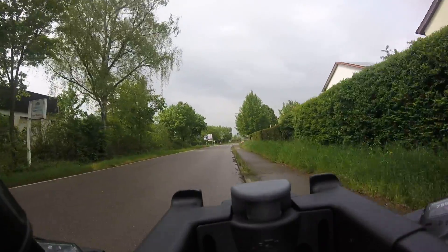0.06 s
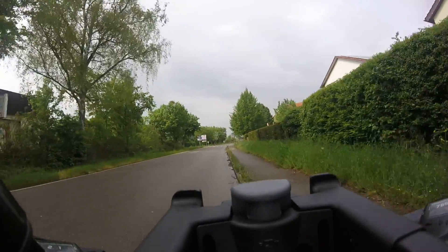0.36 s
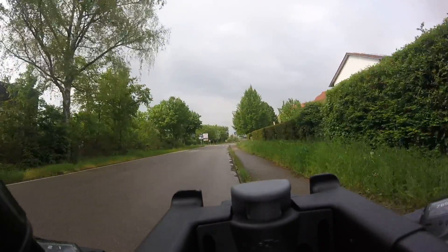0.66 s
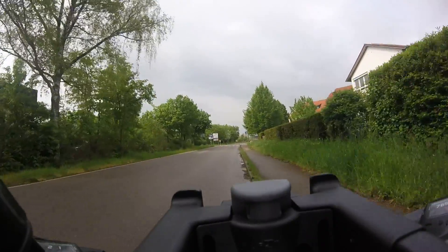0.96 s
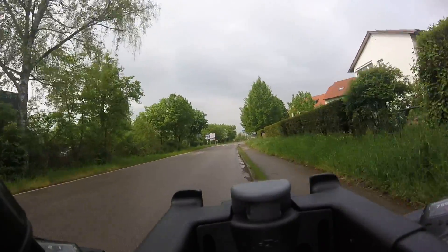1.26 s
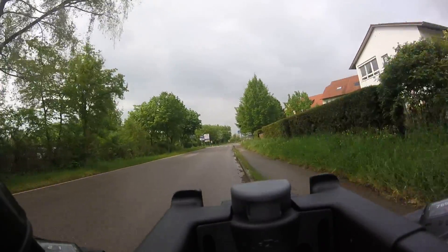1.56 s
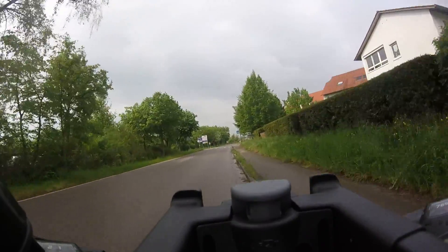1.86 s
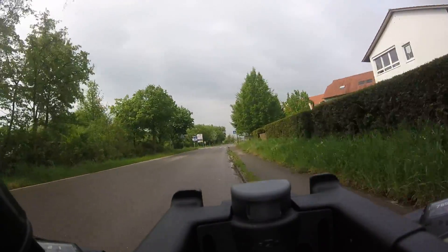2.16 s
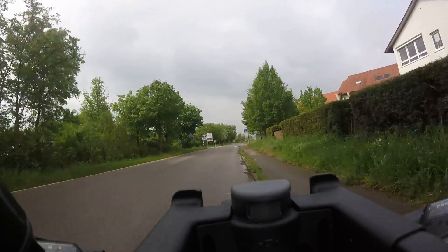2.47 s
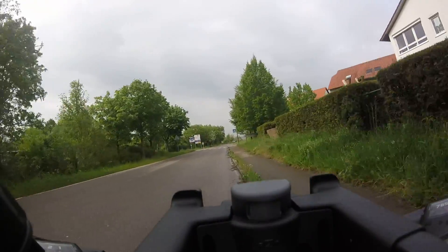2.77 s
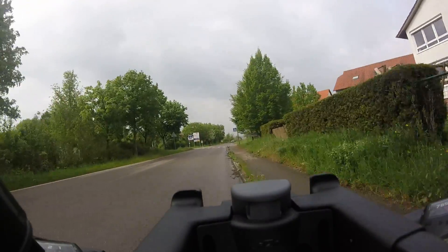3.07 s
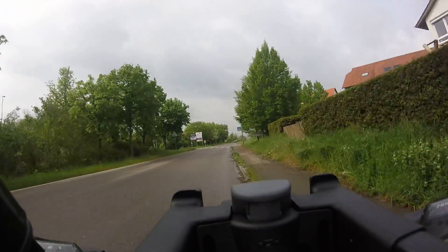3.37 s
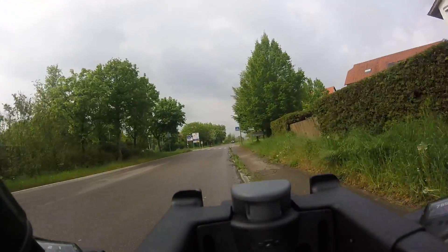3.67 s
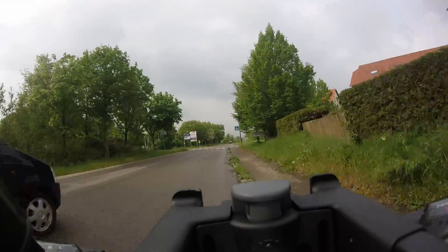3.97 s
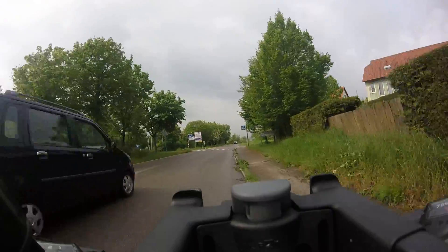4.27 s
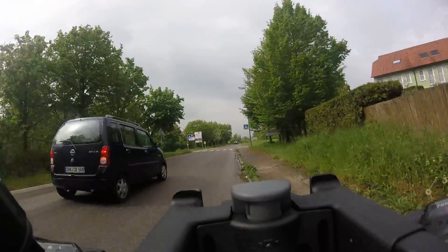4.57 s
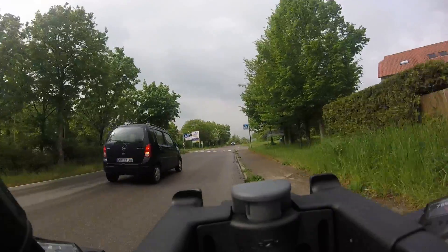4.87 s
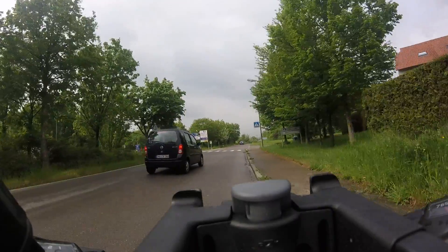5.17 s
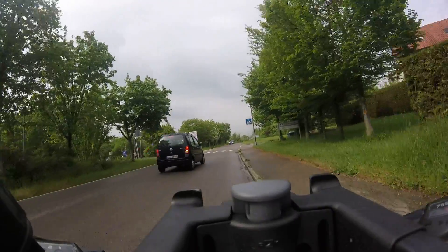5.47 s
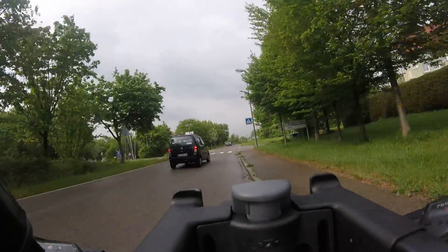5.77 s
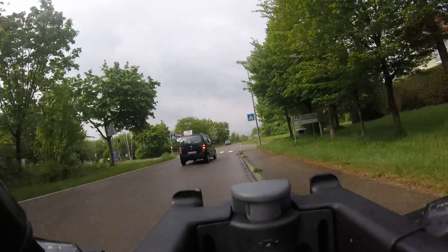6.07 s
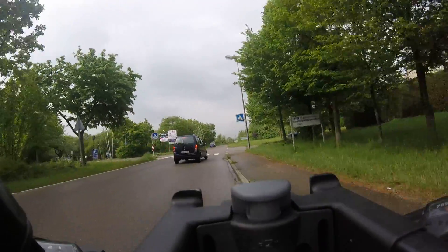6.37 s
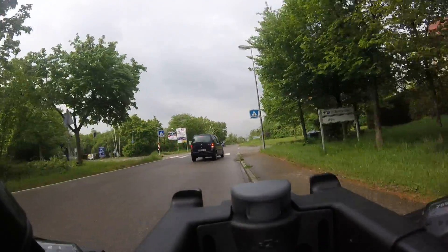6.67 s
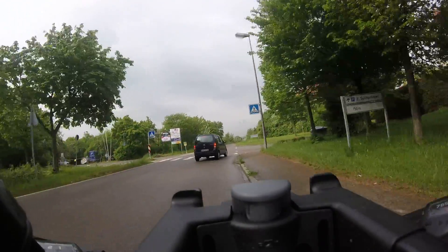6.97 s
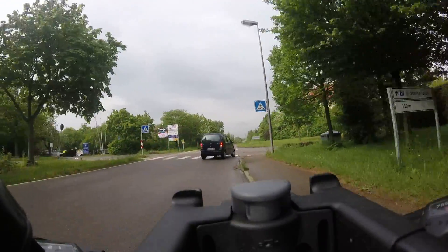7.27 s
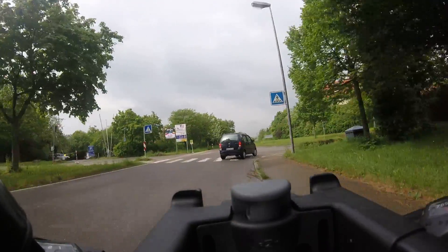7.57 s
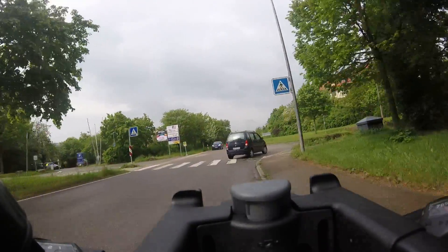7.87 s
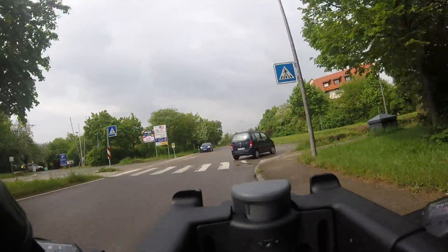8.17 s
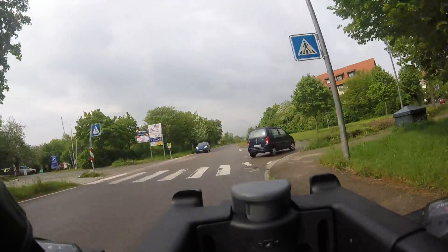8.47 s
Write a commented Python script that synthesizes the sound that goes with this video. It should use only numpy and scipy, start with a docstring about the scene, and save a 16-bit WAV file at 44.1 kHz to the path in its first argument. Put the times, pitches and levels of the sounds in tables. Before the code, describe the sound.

A bicycle rides on asphalt for about eight and a half seconds, heard from the handlebar with a close, boxy colour. Throughout, the tyres drone loudly in several wavering tones over road rumble, gritty noise and a deep throbbing dynamo hum. The chain patters with the pedal strokes, and fittings and cables tick and clack lightly. A hollow knock comes at 1.2 seconds and a softer one at 3.7. From about 3.5 to 5 seconds a car overtakes with faint tyre hiss and a low rumbling wake. The bicycle's hum drops between 4 and 5 seconds, with deep brief thumps at 4 and 4.8. The drone returns with another knock at 5.3 and more frequent clacks. The loudest, sharpest knock lands at 7 seconds, followed by a small rattling bump near 7.8. From 8 seconds the chain fades and the freewheel ticks softly under the continuing hum.

```python
"""Bicycle on asphalt, from the handlebar

One microphone inside a camera case clamped to the bar; the case colours every contact. Up close, road
shake rumbles in the frame, the tyres hum with the speed and the hub dynamo throbs with each wheel turn.
The chain patters under the pedal strokes, loose fittings rattle and a few bumps knock the mount.
Further off, a car overtakes near the middle. At the end the rider coasts and the freewheel ticks."""
import sys
import numpy as np
from scipy import signal
from scipy.fft import rfft, irfft
from scipy.io import wavfile
from scipy.ndimage import uniform_filter1d, minimum_filter1d, map_coordinates

SR = 44100
rng = np.random.default_rng(int(sys.argv[2]) if len(sys.argv) > 2 else 0)


def generate_wav(sig):
    """Save sig (samples, or channels by samples) to the path in sys.argv[1] as 16-bit PCM at SR."""
    pcm = np.round(np.clip(np.atleast_2d(sig).T, -1, 1) * 32767).astype(np.int16)
    wavfile.write(sys.argv[1], SR, pcm)


N = 380141

# riding speed: time_s, wheel_turns_per_s
WHEEL_SPEED = [(0, 2.688), (.7, 2.721), (1.4, 2.731), (2.2, 2.768), (3, 2.794), (3.8, 2.817), (4.6, 2.816),
               (5.4, 2.87), (6, 2.873), (6.6, 2.927), (7.4, 2.917), (8, 2.873), (8.62, 2.822)]
# base level of the gritty road noise: time_s, level_db
ROAD_NOISE = [(0, -39), (.9, -39.5), (2, -39), (3.7, -38.5), (4, -41), (4.3, -44), (4.8, -40), (5.3, -39.5),
              (6, -41), (6.9, -40), (7.75, -38.5), (8, -42), (8.62, -39.5)]
# base levels of the two lower tread tones: time_s, low_db, middle_db
TREAD_HUM = [(0, -29, -12.5), (.45, -22.5, -19.5), (.9, -25.5, -20), (1.2, -19.5, -17), (1.45, -28.5, -22),
             (1.7, -20.5, -18.5), (2.2, -25, -19.5), (2.5, -25.5, -22), (3, -18, -24.5), (3.6, -23, -22),
             (4.1, -26.5, -32.5), (4.55, -28, -31.5), (5, -24.5, -29), (5.4, -22, -28), (6, -22, -29.5),
             (6.7, -21, -31.5), (7.3, -20, -28), (7.8, -20.5, -32.5), (8.15, -23.5, -28),
             (8.62, -27, -17.5)]
# base level of the tread's singing tone: time_s, level_db
TREAD_SING = [(0, -26), (.45, -27), (.8, -30), (1.2, -32), (1.38, -26), (1.55, -36), (1.6, -20.5),
              (1.85, -25), (2.05, -21.5), (2.48, -30), (2.58, -22), (2.68, -33), (2.98, -21.5), (3.2, -27),
              (3.35, -24.5), (3.6, -31), (3.8, -28), (4.1, -36), (4.5, -40), (5, -35), (5.3, -24.5),
              (5.52, -33), (5.72, -26), (6.4, -30), (6.62, -25), (7, -25.5), (7.15, -30), (7.3, -24.5),
              (7.8, -29), (8.62, -23.5)]
# base level of the dynamo's hum: time_s, level_db
DYNAMO_HUM = [(0, -27), (.7, -25), (1.6, -25.5), (2.4, -26.5), (3, -25), (3.6, -26.5), (4.05, -24),
              (4.5, -23), (5.8, -25.5), (6.2, -28), (6.8, -23), (7.6, -25), (8.62, -25.5)]
# where the dynamo drags in each wheel turn: place_turns, width_turns, rise_db
DYNAMO_DRAG = [(0.273, 0.086, 11), (.48, 0.041, 6.5), (.82, 0.069, 11)]
# the two legs' pushes in each crank turn: place_turns, width_turns, effort_share
PEDAL_PUSHES = [(0.371, 0.15, .95), (.85, 0.16, 0.8)]
# rough patches that rattle the chain and fittings: centre_s, width_s, rise_db
ROUGH_PATCHES = [(0.333, 0.11, 5), (1.19, 0.08, 7), (2.036, 0.079, 7), (3.68, 0.11, 7), (6.164, 0.06, 5),
                 (6.98, .03, 6), (7.74, 0.08, 9)]
# two brief, deep thumps in the rumble: centre_s, peak_db
LOW_THUMPS = [(4.04, -6.5), (4.795, -11)]
# bumps that knock the mount: start_s, ring_peak_db, ring_pitch_hz, crack_peak_db
ROAD_BUMPS = [(1.1765, -16, 645, -26), (3.669, -27, 640, -32), (5.325, -19, 645, -33),
              (6.971, -7, 612, -19), (7.771, -26, 640, -36)]
# the mount's upper modes, relative to its hollow ring: pitch_hz, level_db, t60_s
MOUNT_MODES = [(1035, -20, .04), (1690, -3.5, .022), (1960, -11, .022), (2380, -11, .022)]
# resonances and notches of the case around the microphone: centre_hz, width_hz, gain_db
CASE_RESONANCES = [(538, 76.3, 11.5), (608, 27, 3), (993, 66, 10), (1190, 55, 4), (1400, 70, 2),
                   (1640, 92, 7.5), (1775, 60, -5), (1858, 90, 6), (2190, 130, -2.5), (2320, 90, 2.5),
                   (2450, 65, 3), (2800, 150, -13), (3000, 70, -11), (3130, 170, 7), (3470, 90, 4),
                   (3950, 110, -3), (4250, 82, 2), (4840, 110, -4), (5340, 480, -8), (5880, 260, 3),
                   (6520, 450, 4), (8360, 170, -3), (8640, 170, 3), (9450, 600, -3), (10200, 500, 4)]

# single contacts on the bicycle: start_s, peak_db
CHAIN_CLICKS = [(0.089, -33), (0.21, -40), (.245, -41), (.274, -38), (0.288, -34), (.31, -42), (.33, -42),
                (.414, -39), (.475, -41), (.575, -41), (.64, -42), (.656, -38), (.78, -42), (0.942, -34),
                (1.146, -26), (1.166, -37), (1.249, -42), (1.2336, -37), (1.267, -33), (1.387, -40),
                (1.511, -43), (2.034, -36.5), (2.0524, -34.5), (2.792, -38), (2.834, -34), (3.158, -47),
                (3.592, -39), (3.61, -38), (3.669, -35), (3.69, -37), (3.708, -31), (3.726, -35),
                (4.932, -37), (6.124, -38.5), (6.18, -41), (6.206, -49), (6.82, -45), (6.971, -31),
                (6.982, -41), (6.994, -43.5), (7.024, -37), (7.044, -38), (7.335, -39), (7.3705, -38),
                (7.638, -36), (7.672, -37), (7.691, -40), (7.732, -34), (7.752, -29.5), (7.771, -30.5),
                (7.848, -38)]  # bright, from the links
HARD_TICKS = [(0.363, -40), (.453, -36), (0.62, -36), (0.736, -40), (1.1032, -38), (1.203, -35),
              (1.295, -36), (1.308, -35), (1.475, -29), (1.849, -39.5), (2.155, -35), (2.2125, -38),
              (2.578, -34), (2.834, -33), (2.945, -38), (3.034, -35.5), (3.1557, -31), (3.302, -36),
              (3.627, -40), (3.67, -38), (3.785, -40), (4.0236, -35.5), (4.381, -37), (5.0992, -36),
              (5.3074, -32.5), (5.452, -32), (5.626, -35), (5.7365, -34), (5.805, -35), (6.048, -35),
              (6.163, -38), (6.1786, -39), (6.2218, -35), (6.5122, -34), (6.857, -37), (6.9287, -35.5),
              (6.9703, -38), (7.0437, -37.5), (7.0664, -36), (7.209, -41.5), (7.3178, -38.5),
              (7.5606, -41.5), (7.67, -33), (7.731, -37)]  # small hard ticks, many recurring once per wheel turn
CABLE_CLACKS = [(1.3608, -25), (1.517, -28), (1.9764, -27), (3.1684, -25.5), (3.8016, -29), (3.8796, -21),
                (4.142, -29), (4.454, -31), (4.59, -27.5), (4.6726, -25.5), (4.8609, -25), (4.9327, -20.5),
                (5.3074, -28), (5.58, -28), (5.6414, -24), (5.85, -34), (5.9893, -28), (6.084, -26.5),
                (6.3395, -28), (6.407, -30), (6.4782, -27), (6.551, -26.5), (7.101, -28), (7.179, -27.5),
                (7.465, -30), (8.046, -25.5), (8.1312, -26), (8.211, -27)]  # duller, from chain and cables

# spectral shapes before the case colours them: frequency_hz, relative_db
SHAKE_SPECTRUM = [(12, -11), (30, -13.5), (45, -8), (75, -1.5), (100, -3.5), (122, 0), (138, -3), (149, -7),
                  (180, -3.5), (230, -5.5), (272, -6), (298, -26), (340, -19), (375, -47)]  # the shaking frame
GRIT_SPECTRUM = [(200, -11.5), (370, -3), (440, 5.5), (600, 9.5), (700, 3), (820, -2.5), (930, -5.5),
                 (1500, -2.57), (2100, -11), (3300, -19.5), (4500, -27.5), (6000, -38), (9000, -43),
                 (12000, -58.5)]  # stones under the tyres
CRACK_SPECTRUM = [(600, -10), (900, -2), (1350, 3), (1700, 10), (2000, -1), (2400, 0), (2700, -3),
                  (3200, -19), (4500, -20), (5300, -30), (6000, -25), (10000, -48)]  # a bump's dull crack in the clamp
CLACK_SPECTRUM = [(800, -20), (1300, -8), (1650, -5), (1950, -1), (2200, 3), (2520, -1), (2850, -10),
                  (3300, -16), (4200, -26), (5300, -38), (6300, -34), (10000, -56)]  # chain and cables clacking
LINK_SPECTRUM = [(1200, -13), (2400, 0), (3200, -3), (3700, -2.5), (4300, -4), (5250, -18), (5850, -7.5),
                 (6500, -19), (7500, -27), (8350, -28), (8700, -17), (9300, -35), (10400, -35),
                 (14000, -57)]  # a link's dry, bright click
RATTLE_SPECTRUM = [(1200, -22.5), (2400, -9.5), (3400, 10), (4400, 2), (6000, -13), (7500, -16.5),
                   (10500, -30.5), (14000, -52.5)]  # loose parts chattering
TICK_SPECTRUM = [(900, -15), (2400, 9), (3300, 8), (4200, 9), (5200, -5), (6000, -3), (7500, -12),
                 (8700, -13), (10500, -29), (14000, -56)]  # a small hard tick
HISS_SPECTRUM = [(800, -0.5), (2000, -12.5), (4000, -23), (5700, -24.5), (6350, -13), (7000, -28.5),
                 (10500, -33), (14000, -51.5)]  # the car's tyre hiss
SIZZLE_SPECTRUM = [(1500, -0.5), (3300, 1.5), (4500, -5.5), (6200, -12), (8500, -21), (11000, -19),
                   (14000, -35.5)]  # grit under the car's tyres
WAKE_SPECTRUM = [(55, -19.5), (80, 2.5), (115, 4.5), (140, -4.5), (175, -16)]  # rumble in the car's wake
PAWL_SPECTRUM = [(1500, -14), (2400, 6), (3300, 7), (4400, -8), (5300, -16), (6400, -11), (7500, -27),
                 (10000, -36)]  # a freewheel pawl
RUB_SPECTRUM = [(2200, -15), (3400, 4), (4400, 1.5), (6000, -11.5), (7700, -10.5), (10500, -27),
                (14000, -52.5)]  # something brushing the rear wheel

GEAR_RATIO = 2.327  # wheel turns per crank turn


def road(shake_db=-17, rise_share=.81, stones_boost_db=10):
    """Uneven asphalt shakes the frame under the microphone; countless stones pass under the tyres."""
    noise_db, = curves(ROAD_NOISE)
    shake = unit(through_case(rng.standard_normal(N), SHAKE_SPECTRUM))
    stones = unit(through_case(grains(depth_db=1.8, rate_hz=160), GRIT_SPECTRUM))
    rumble_db = shake_db + rise_share * road_noise_rise_db() + wobble(9.1)
    return amp(rumble_db) * shake + amp(noise_db + stones_boost_db) * stones


def tyres(waver_hz=2.542, push_db=2.5, glide_share=.78, octave_db=-41.5):
    """The tread drones in tones that follow the speed; out of round, it swells three of them each turn."""
    wheel_hz, = curves(WHEEL_SPEED)
    low_db, middle_db = curves(TREAD_HUM)
    sing_db, = curves(TREAD_SING)
    turns = wheel_turns()
    low_hz, middle_hz = 59 * wheel_hz, 96.8 * wheel_hz
    # the highest tone sits on the case's strongest resonance and glides a little less
    sing_hz = glide_share * 195.5 * wheel_hz + (1 - glide_share) * CASE_RESONANCES[0][0]
    low_db += swells(turns, [(.98, .072, 1.7)]) + push_db * effort() + 2 * wobble(14)
    middle_db += swells(turns, [(.1, .12, 1.4)]) + 1.5 * wobble(16)
    sing_db += swells(turns, [(.68, .061, 1.3)]) + wobble(28)
    low = amp(low_db) * rolling_tone(low_hz, rough_share=.18, flutter_hz=26)
    middle = amp(middle_db) * rolling_tone(middle_hz, rough_share=.13, flutter_hz=27)
    octave = amp(octave_db) * rolling_tone(2 * low_hz, rough_share=.97, flutter_hz=20)
    sing = amp(sing_db) * rolling_tone(sing_hz + waver_hz * wobble(40), rough_share=.43, flutter_hz=42)
    return low + middle + octave + sing


def dynamo(poles=28, waver_hz=3, unsteady_db=.7):
    """The hub dynamo's poles make a deep hum that throbs as the wheel goes round."""
    level_db = curves(DYNAMO_HUM)[0] + swells(wheel_turns(), DYNAMO_DRAG) + unsteady_db * wobble(3)
    pitch_hz = poles * curves(WHEEL_SPEED)[0] + waver_hz * wobble(9)
    return amp(level_db) * rolling_tone(pitch_hz, rough_share=.071, flutter_hz=26)


def low_thumps(pitch_hz=80, width_s=.021):
    """The rumble peaks in brief thumps, each a few deep cycles long."""
    t = np.arange(N) / SR
    return sum(amp(peak_db) * bell(centre_s, width_s) * np.sin(2 * np.pi * (pitch_hz * t + rng.random()))
               for centre_s, peak_db in LOW_THUMPS)


def mount_knocks(swell_s=.0048, hollow_t60_s=.055, upper_rise_s=.0025):
    """Right at the microphone, a bump cracks in the clamp and a short hollow ring swells in the mount."""
    out, t = np.zeros(N + SR), np.arange(SR // 5) / SR
    hollow_envelope = (1 - np.exp(-(t / swell_s) ** 4)) * amp(-60 * (t - swell_s) / hollow_t60_s)
    upper = sum(amp(db - 60 * t / t60_s) * np.sin(2 * np.pi * hz * t) for hz, db, t60_s in MOUNT_MODES)
    upper *= 1 - np.exp(-(t / upper_rise_s) ** 2)
    for start_s, peak_db, pitch_hz, _ in ROAD_BUMPS:
        ring = hollow_envelope * np.sin(2 * np.pi * pitch_hz * t) + upper
        add(out, start_s, amp(peak_db) * ring / np.abs(ring).max())
    cracks = [(start_s, crack_db) for start_s, _, _, crack_db in ROAD_BUMPS]
    return out[:N] + strikes(cracks, CRACK_SPECTRUM, chatter=.38, t60_s=.045)


def chain(teeth=42, link_db=-42.5, push_db=10.5, graze_db=-53, jitter_s=.0006):
    """Links clack onto the chainring, harder with each push, and click brightly under the stronger leg."""
    crank_turns = wheel_turns() / GEAR_RATIO
    at = np.flatnonzero(np.diff(np.floor(teeth * crank_turns)))
    time_scatter, seat_scatter, graze_scatter = np.clip(rng.standard_normal((len(at), 3)), -2, 1.3).T
    start_s = at / SR + jitter_s * time_scatter
    seat_rise_db = push_db * effort() + road_noise_rise_db()
    graze_rise_db = swells(crank_turns, [(.36, .078, 9.7)]) + .5 * rattle_rise_db()
    seats = np.column_stack([start_s, link_db + seat_rise_db[at] + 4 * seat_scatter])
    grazes = np.column_stack([start_s, graze_db + graze_rise_db[at] + 2 * graze_scatter])
    clatter = strikes(seats, CLACK_SPECTRUM, chatter=.07, t60_s=.018)
    clicks = strikes(np.vstack([grazes, CHAIN_CLICKS]), LINK_SPECTRUM, chatter=.25, t60_s=.014)
    return (clatter + clicks) * (1 - coasting())


def rattles(rattle_db=-49, scatter_db=4.5, count=110):
    """Loose parts close by chatter faintly all the way; hard ticks and duller clacks sound over them."""
    at = rng.integers(0, N, count)
    peak_db = rattle_db + rattle_rise_db()[at] + scatter_db * np.clip(rng.standard_normal(count), -2, 1.3)
    rattle = strikes(np.column_stack([at / SR, peak_db]), RATTLE_SPECTRUM, chatter=.3, t60_s=.014)
    ticks = strikes(HARD_TICKS, TICK_SPECTRUM, chatter=.3, t60_s=.017)
    clacks = strikes(CABLE_CLACKS, CLACK_SPECTRUM, chatter=.3, t60_s=.034)
    return rattle + ticks + clacks


def passing_car(abreast_s=3.8, nearing_s=.54, leaving_s=.79, hiss_db=-57, sizzle_db=-56, wake_db=-19.5):
    """A car's tyres sizzle on the grit alongside, their hiss lingers, and its wake rumbles after it."""
    t = np.arange(N) / SR
    along_road = (t - abreast_s) / np.where(t < abreast_s, nearing_s, leaving_s)
    distance = np.hypot(1, along_road)  # 1 where it is nearest the microphone
    hiss = unit(through_case(rng.standard_normal(N), HISS_SPECTRUM))
    sizzle = unit(through_case(grains(depth_db=5, rate_hz=500), SIZZLE_SPECTRUM))
    wake = unit(through_case(rng.standard_normal(N), WAKE_SPECTRUM))
    return (amp(hiss_db) / distance ** 2 * hiss
            + amp(sizzle_db) * bell(centre_s=3.63, width_s=.19) * sizzle
            + amp(wake_db) * bell(centre_s=4.4, width_s=.66) * wake)


def freewheel(level_db=-41, scatter_db=2.3, teeth=22):
    """Back at the rear hub, the pawls begin to tick over the ratchet as the rider eases off."""
    slip_turns = np.cumsum(curves(WHEEL_SPEED)[0] * np.sqrt(coasting())) / SR
    at = np.flatnonzero(np.diff(np.floor(teeth * slip_turns)))
    peak_db = level_db + scatter_db * rng.standard_normal(len(at))
    return strikes(np.column_stack([at / SR, peak_db]), PAWL_SPECTRUM, chatter=.3, t60_s=.012)


def wheel_rub(level_db=-53, rear_per_front_turn=.9868, attack_turns=.019, release_turns=.095):
    """Faint, behind the microphone: the untrue rear wheel catches once a turn and scrapes free."""
    since_catch = (rear_per_front_turn * wheel_turns() - .952) % 1
    envelope = (1 - np.exp(-since_catch / attack_turns)) * np.exp(-.5 * (since_catch / release_turns) ** 2)
    scrape = unit(through_case(grains(depth_db=4, rate_hz=260), RUB_SPECTRUM))
    return amp(level_db) * envelope * scrape


def wheel_turns():
    """Front wheel turns since the start, one value per sample."""
    return np.cumsum(curves(WHEEL_SPEED)[0]) / SR


def effort():
    """How hard the legs push at each point of the crank's turn, 0-1."""
    return swells(wheel_turns() / GEAR_RATIO, PEDAL_PUSHES)


def coasting(start_s=8.0, ease_s=.3):
    """0 while the rider pedals, rising to 1 as the bicycle rolls free."""
    return np.clip((np.arange(N) / SR - start_s) / ease_s, 0, 1)


def road_noise_rise_db():
    """Road noise level above its average."""
    noise_db, = curves(ROAD_NOISE)
    return noise_db - noise_db.mean()


def rattle_rise_db():
    """The rattling follows the road noise level and leaps on rough patches."""
    patches_db = sum(db * bell(centre_s, width_s) for centre_s, width_s, db in ROUGH_PATCHES)
    return road_noise_rise_db() + patches_db


def rolling_tone(pitch_hz, rough_share, flutter_hz):
    """A tone of rms 1; the uneven road scatters a share of its power into close sidebands."""
    phase = 2 * np.pi * np.cumsum(pitch_hz) / SR + rng.uniform(0, 2 * np.pi)
    sidebands = unit(wobble(flutter_hz) * np.sin(phase) + wobble(flutter_hz) * np.cos(phase))
    return np.sqrt(1 - rough_share) * unit(np.sin(phase)) + np.sqrt(rough_share) * sidebands


def strikes(rows, spectrum, chatter, t60_s, colour_db=2, rise_s=.0011, size=2048):
    """Each contact (start_s, peak_db) scrapes in, pushes and chatters briefly, with its own colour."""
    out, t = np.zeros(N + SR), np.arange(size) / SR
    body = rfft(case_response(spectrum)[:size], 2 * size)
    envelope = np.minimum((t / rise_s) ** 2, amp(-60 * (t - rise_s) / t60_s))
    forces = chatter * rng.standard_normal((len(rows), size)) * envelope
    forces[:, round(rise_s * SR)] += 1  # the push
    bands = np.fft.rfftfreq(2 * size, 1 / SR) / 900  # one random gain every 900 Hz
    for (start_s, peak_db), force in zip(rows, forces):
        colour = amp(colour_db * np.interp(bands, np.arange(26), rng.standard_normal(26)))
        hit = irfft(rfft(force, 2 * size) * body * colour)[:size]
        add(out, start_s, amp(peak_db) * hit / np.abs(hit).max())
    return out[:N]


def case_response(spectrum, size=16384):
    """Impulse response of a contact with this spectrum, ringing in the camera case."""
    hz = np.fft.rfftfreq(size, 1 / SR)
    shape_hz, shape_db = np.transpose(spectrum)
    db = np.interp(np.log(hz + 1), np.log(shape_hz), shape_db)
    # beyond the shape's ends: 48 dB an octave down above, 12 below
    db -= 48 * np.log2(np.maximum(hz / shape_hz[-1], 1))
    db -= 12 * np.log2(np.maximum(shape_hz[0] / (hz + 1), 1))
    db += sum(gain * .5 ** ((2 * (hz - centre) / width) ** 2) for centre, width, gain in CASE_RESONANCES)
    # minimum phase, so nothing rings before the contact
    cepstrum = irfft(np.log(amp(db) + 1e-6))
    cepstrum[1:size // 2] *= 2
    cepstrum[size // 2 + 1:] = 0
    return irfft(np.exp(rfft(cepstrum)))


def through_case(force, spectrum):
    """A force as the microphone hears it inside the case."""
    return signal.fftconvolve(force, case_response(spectrum))[:N]


def grains(depth_db, rate_hz):
    """Gritty noise whose level flickers at random."""
    return rng.standard_normal(N) * amp(depth_db * wobble(rate_hz))


def swells(turns, rows):
    """Rounded swells that come back once a turn: place_turns, width_turns, height."""
    return sum(height * np.exp(-.5 * (((turns - place + .5) % 1 - .5) / width) ** 2)
               for place, width, height in rows)


def bell(centre_s, width_s):
    """One Gaussian swell of height 1."""
    return np.exp(-.5 * ((np.arange(N) / SR - centre_s) / width_s) ** 2)


def wobble(rate_hz):
    """A smooth random curve with rate_hz knots a second."""
    knots = rng.standard_normal(int(N * rate_hz / SR) + 4)
    return map_coordinates(knots, [np.arange(N) * rate_hz / SR])


def curves(rows):
    """One value per sample for each column after the time."""
    time_s, *columns = np.transpose(rows)
    return [np.interp(np.arange(N) / SR, time_s, column) for column in columns]


def amp(db):
    """Decibels to gain."""
    return 10 ** (np.asarray(db) / 20)


def unit(x):
    """Scale to rms 1."""
    return x / np.sqrt(np.mean(x ** 2) + 1e-20)


def add(out, start_s, sound):
    """Mix a sound into out at start_s."""
    out[max(round(start_s * SR), 0):][:len(sound)] += sound


def scene():
    """The bicycle and the passing car, in mono at the handlebar."""
    rolling = tyres() + dynamo() + road()
    mechanics = chain() + rattles() + freewheel() + wheel_rub()
    jolts = mount_knocks() + low_thumps()
    return (rolling + mechanics + jolts + passing_car())[None]


def record(dry, ceiling=.82, hold_samples=300, top_hz=15700):
    """The camera's limiter ducks the largest swings; a steep low-pass sets its band limit."""
    needed_gain = np.minimum(1, ceiling / (np.abs(dry) + 1e-9))
    held_gain = minimum_filter1d(needed_gain, hold_samples)
    gain = uniform_filter1d(uniform_filter1d(held_gain, hold_samples // 2), hold_samples // 2)
    return signal.sosfilt(signal.butter(16, top_hz, fs=SR, output="sos"), dry * gain)


dry = scene()
out = record(dry)
generate_wav(out)
```